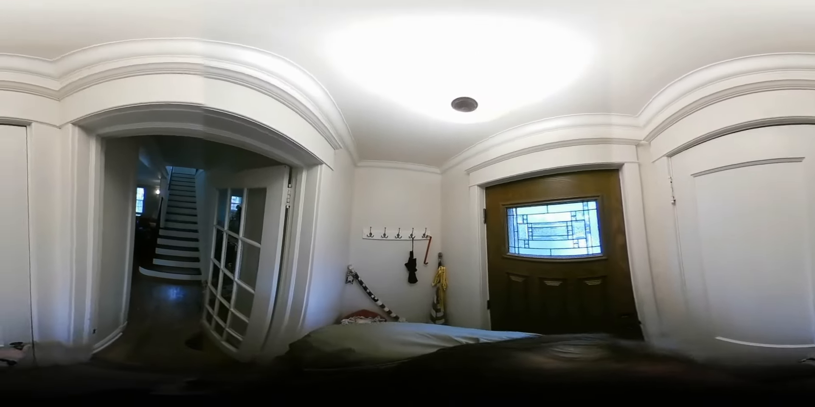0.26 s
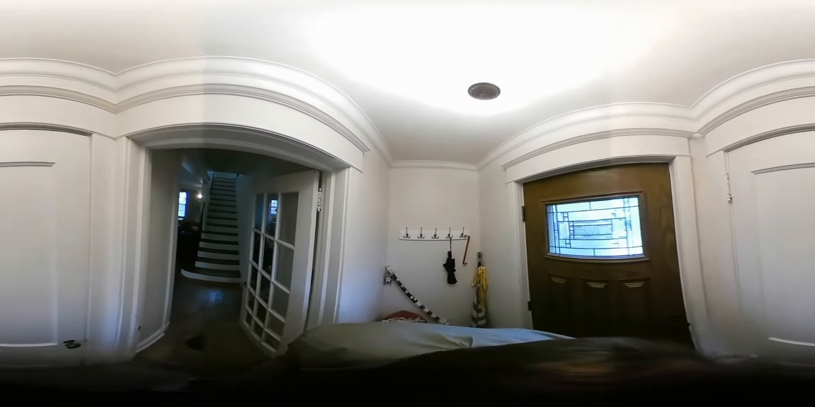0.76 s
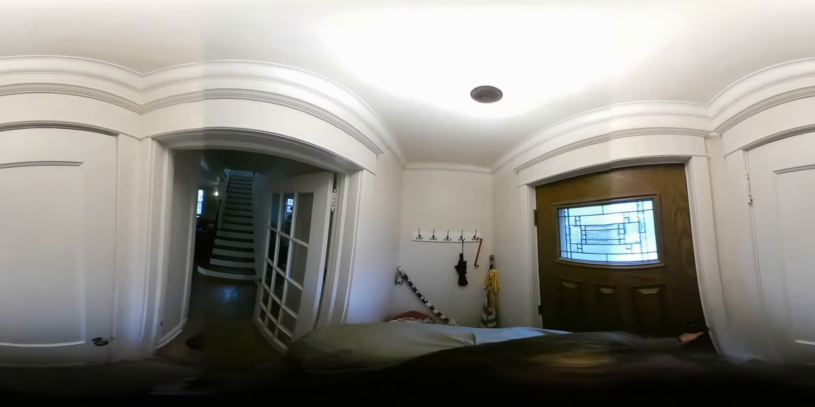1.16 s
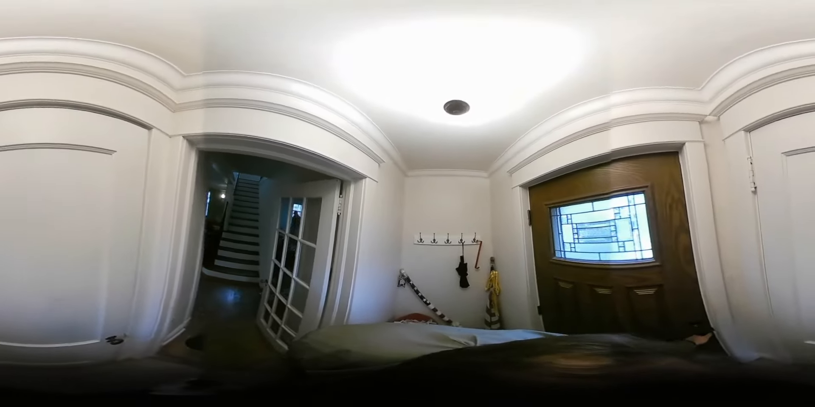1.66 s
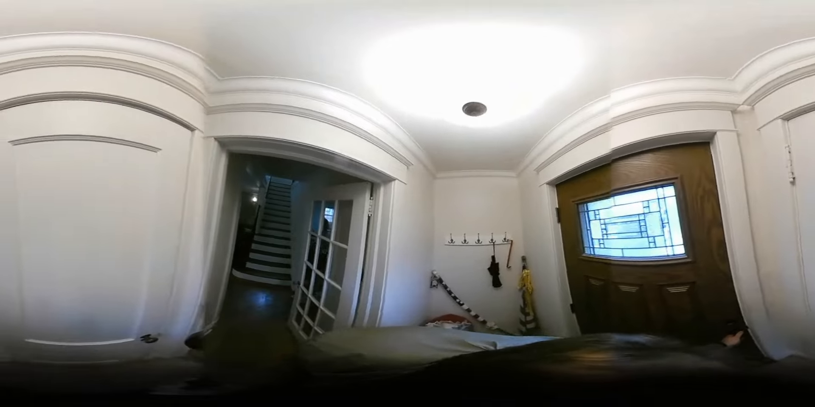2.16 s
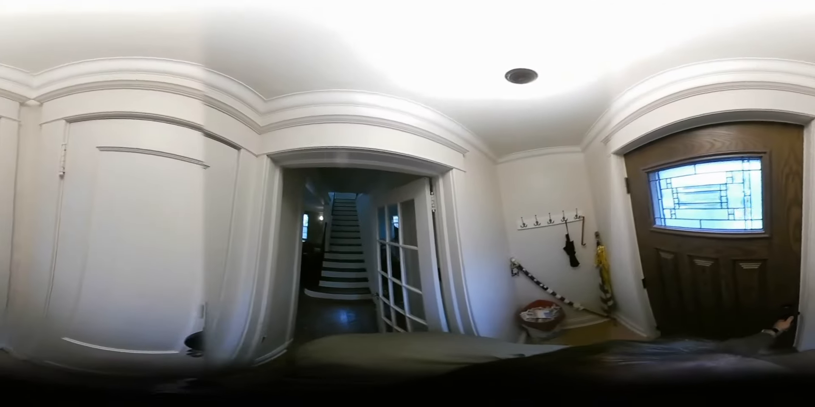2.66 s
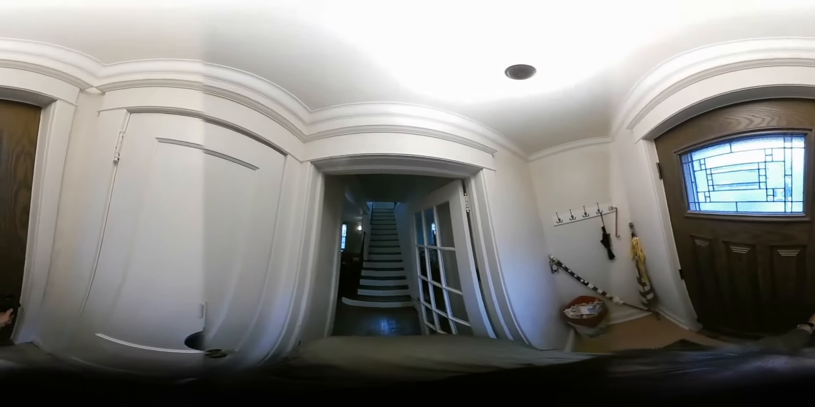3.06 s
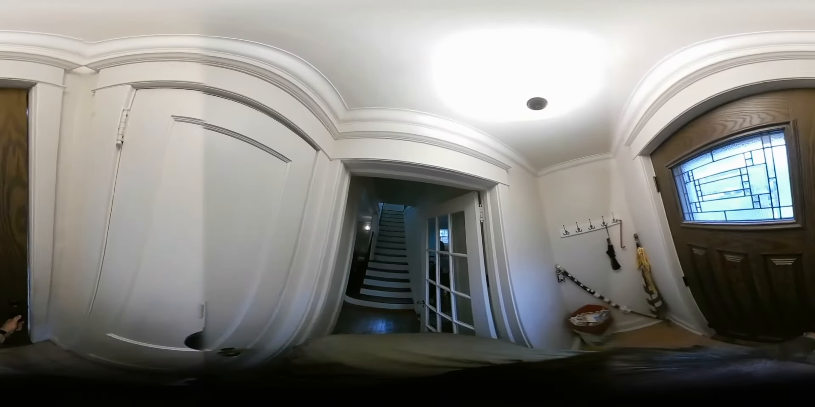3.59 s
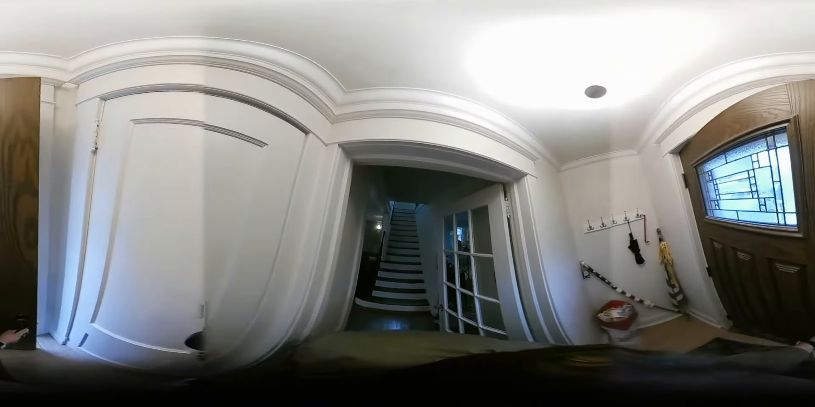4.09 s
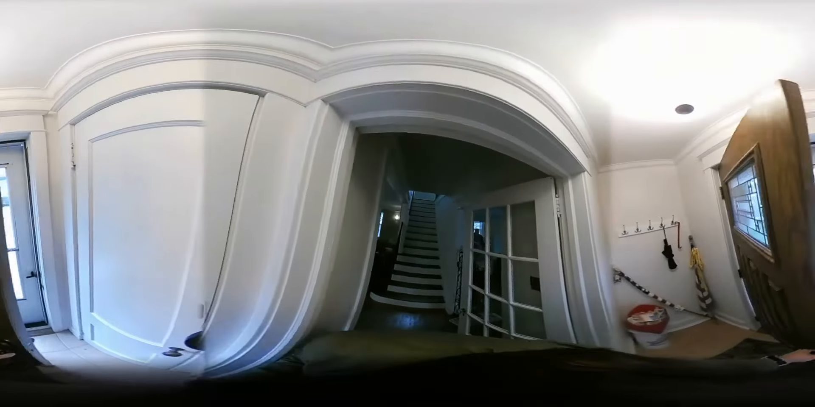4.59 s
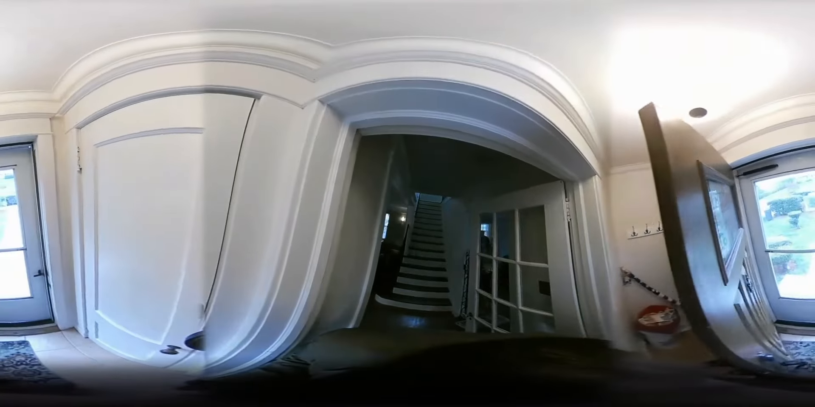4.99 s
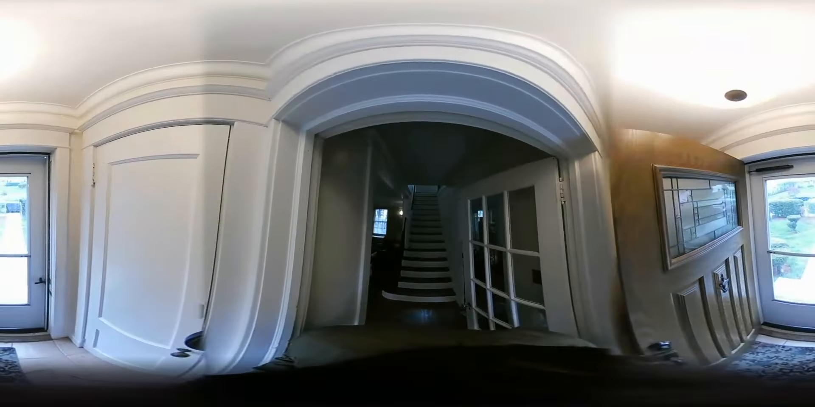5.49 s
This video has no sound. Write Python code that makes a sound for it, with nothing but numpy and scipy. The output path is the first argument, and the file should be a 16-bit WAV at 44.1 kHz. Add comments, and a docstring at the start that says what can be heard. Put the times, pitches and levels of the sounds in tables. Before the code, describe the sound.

In a small hall a door shuts loudly, a handle squeaks, then a bolt and knob click and the front door scrapes open.

```python
"""An inner door thumps shut in a small hall with hard walls; its handle squeaks back and the latch drops.
Someone steps across in a rustling jacket, turns the front door's bolt and knob, and pulls that door
off its rubber seal. It swings open on quiet outdoor air. Blows are fading tones and bursts of noise,
rubbing is noise that swells and fades, and the squeak is a tone made by steel that sticks and slips.
The right microphone faces away and hears little treble."""
import sys
import numpy as np
from scipy import signal
from scipy.fft import rfft, irfft, next_fast_len
from scipy.io import wavfile
from scipy.ndimage import map_coordinates

SR = 44100
rng = np.random.default_rng(int(sys.argv[2]) if len(sys.argv) > 2 else 0)


def waveform_to_disk(signal):
    """Save audio, clipped to [-1, 1], as 16-bit WAV at the path in sys.argv[1]."""
    frames = np.transpose(np.atleast_2d(signal))
    scaled = np.clip(frames, -1, 1) * 32767
    samples = np.round(scaled).astype(np.int16)
    wavfile.write(sys.argv[1], SR, samples)


N = 253134
TIME = np.arange(N) / SR
AFTER = TIME[:SR]  # the second that follows a blow

# Levels are relative. A "colour" says how strong each frequency is; t60 is the time to fade by 60 dB.
# the inner door hits its frame and bounces: t/s, level/dB
DOOR_HITS = [(0.0, -7), (0.025, -21), (0.091, -25)]
# notes of the door and hall ringing together: f/Hz, level/dB, t60/s
DOOR_NOTES = [(75.85, -3.5, 0.71), (89.8, -3.5, 0.76), (109, -10.5, 0.33), (128, -5, 0.7), (138, 0, 0.34),
              (251.2, -6.5, 0.23), (310.4, -6, 0.41), (375, -5.5, 0.36), (440, -22.5, 0.11),
              (507, -7.5, 0.21), (581, -20, 0.38), (628, -18, 0.27), (704, -15, 0.061), (790, -17, 0.34),
              (890, -22.5, 0.28), (920, -23.5, 0.43)]
# colour of the slam's crash: f/Hz, level/dB
CRASH_COLOUR = [(60, -4), (130, 4), (190, -8), (320, 0.5), (410, -8.5), (530, -5.5), (800, -11),
                (1400, -21.5), (4000, -33), (8000, -47), (13000, -53.5)]
# latch, bolt and knob clicks:
# t/s, level/dB, bass weight, treble weight, fade time as a share of the hall's, ring f/Hz, ring boost/dB
LOCK_CLICKS = [(0.091, -32.5, 4.5, -25, 1, 4070, -4.5), (0.238, -41.5, 6, -21.5, 0.71, 2120, 2),
               (0.256, -42, 14.5, -24, 0.62, 2500, 8), (0.4335, -42.5, -1.5, -19.5, 0.71, 4600, 2.5),
               (0.7128, -38.5, -2, -20.5, 0.75, 1876, 3.5), (1.295, -46, 5.5, -21, 0.61, 3530, -3.5),
               (1.305, -43, 1.5, -26, 0.66, 5400, -0.5), (1.808, -43.5, 7, -17, 0.65, 3030, 7.5),
               (1.815, -35.5, 5, -15.5, 0.8, 3520, 6), (1.828, -44.5, -11, -34, 0.98, 1016, 24),
               (1.92, -40, 9, -21, 0.85, 1610, 0), (1.9431, -36, -4.5, -18, 0.61, 5360, 4.5),
               (1.9489, -36, -25, -19.5, 0.51, 3255, 9.5), (2.234, -61, -7.5, -16, 0.64, 2660, 8),
               (3.1221, -38.5, -8, -21, 0.544, 1350, 2.5), (3.1886, -43.5, -8, -11.5, 0.56, 4830, 13),
               (3.503, -50, -15.5, -5, 0.76, 5770, 15.5), (3.552, -47.5, -24, -6.5, 0.7, 2480, 10.5),
               (4.010, -42, -3, -33, 0.46, 2365, 14), (4.033, -33, 14, -33.5, 1, 1210, 0),
               (4.068, -39.5, -8, -16.5, 0.74, 5950, 4)]
# colour of a steel click: f/Hz, level/dB
CLICK_COLOUR = [(100, -23.5), (220, -13), (400, -9), (650, -2), (1100, 1.5), (2000, -4.5), (2600, -4.5),
                (3300, -6.5), (4500, -10), (6500, -8.5), (10000, -12), (13000, -18)]
# resonances (favourite pitches) of the steel lock: f/Hz, width/Hz, boost/dB
STEEL_RESONANCES = [(880, 53, 1.5), (1337, 90, 5.5), (1987, 86, 6.5), (2132, 52, 7), (3160, 50, 0),
                    (3420, 97, 1.5), (4740, 200, 2.5), (5450, 210, 2), (7400, 130, 3), (8350, 500, 1.5),
                    (10400, 640, 5)]
# resonances of the door's wood: f/Hz, width/Hz, boost/dB
WOOD_RESONANCES = [(138.6, 11, 13.5), (185, 17, -7.5), (223, 43, 11), (305, 33, 14), (384, 48, -0.5),
                   (508.4, 5, 12), (634, 32, 4.5), (800, 100, 2)]
# arm movements in the jacket: t/s, hold/s, level/dB
ARM_MOVES = [(0.43, 0.06, -53), (0.76, 0.04, -61.5), (2.02, 0.02, -61.5), (2.43, 0.033, -59.5),
             (2.76, 0.023, -46.5), (3.0, 0.33, -61), (4.92, 0.031, -61), (5.22, 0.033, -73),
             (5.71, 0.037, -65)]
# colour of sliding cloth: f/Hz, level/dB
CLOTH_COLOUR = [(150, -7), (450, 1), (1300, 0), (2800, -3.5), (6000, -10.5), (9000, -16), (13000, -19)]
# how often the handle's shaft slips, from start to stop: t/s, f/Hz
SLIP_RATE = [(0.437, 533.4), (0.478, 530.1), (0.512, 553.3), (0.542, 546.2), (0.564, 534), (0.581, 485),
             (0.6, 480)]
# moments when the shaft whistles: t/s, hold/s, level/dB
SHAFT_WHISTLES = [(0.472, 0.015, -14.5), (0.522, 0.01, -28.5), (0.56, 0.004, -30.5)]
# tones in the shaft's buzz: multiple of the slip rate, level/dB
BUZZ_HARMONICS = [(1, -11.5), (3, -2), (4, -3), (5, -6.5), (6, -1.5), (7, -15), (8, -9), (9, -19),
                  (10, -16), (11, -13.5), (12, -18.5), (13, -33.5), (14, -37), (15, -47)]
# door and body shove the air: t/s, level/dB
AIR_SHOVES = [(0.45, -46.5), (0.809, -49), (1.33, -56.5), (1.93, -46.5), (2.5, -54), (3.0, -49),
              (3.22, -51.5), (3.7, -37.5), (3.98, -42), (4.14, -38), (4.43, -41.5), (4.98, -50),
              (5.31, -51), (5.599, -56)]
# colour of shoved air: f/Hz, level/dB
RUMBLE_COLOUR = [(12, -31.5), (20, 6), (33, 3.5), (64, -2), (134, 0.5), (172, -20), (218, -6), (265, -11.5),
                 (300, -11), (390, -39.5), (660, -120)]
# brief rubs of shaft, lock and seal: t/s, f/Hz, width/Hz, level/dB, half length/s
BRIEF_RUBS = [(0.595, 1357, 50, -44, 0.03), (0.642, 1102, 50, -52, 0.06), (3.715, 8240, 1593, -40.5, 0.017),
              (3.716, 2330, 600, -44.5, 0.017), (4.043, 526, 51, -28, 0.012),
              (4.045, 660, 126, -34.5, 0.014)]
# steps and knocks on the wooden door: t/s, level/dB, bass weight, treble weight, ring f/Hz
WOOD_KNOCKS = [(0.768, -42, 9.5, -17.5, 152), (0.803, -52.5, -7, -17.5, 203),
               (0.964, -55.5, 0.5, -23.5, 157.3), (1.302, -40.5, -14, -14.5, 300),
               (1.462, -52.5, -15.5, -26, 310), (1.623, -47, -33, -19.5, 553), (1.785, -50, -16, -18, 720),
               (1.829, -39.5, -22, -13, 300), (1.853, -38, 0.5, -16, 300), (2.4, -51, 5.5, -21, 150),
               (2.537, -49, -22, -18, 420), (2.97, -46, 5, -15, 262), (3.059, -49.5, 6, -34, 291),
               (3.123, -31.5, 0.5, -23.5, 186), (3.4, -53, -6, -30, 264), (3.934, -33, 8, -15, 215),
               (3.96, -32.5, 10.5, -43, 220), (3.997, -30, 10, -17, 228), (4.089, -45.5, -16, -7, 223),
               (4.134, -39.5, 13, -16, 333), (4.354, -44.5, 10, -34, 156), (4.409, -46.5, 5, -12.5, 159),
               (4.493, -42.5, -8, -16.5, 640), (4.832, -49, -42, -17.5, 800)]
# colour of a step or knock: f/Hz, level/dB
KNOCK_COLOUR = [(40, -5), (90, -6.5), (140, -4), (190, -6), (300, -7.5), (400, 0.5), (540, 0.5), (800, -3),
                (1400, -0.5), (3000, -13), (7000, -31.5), (13000, -43)]
# the door's edge slides on its seal, then pulls free: t/s, hold/s, level/dB
SEAL_SLIDES = [(3.515, 0.14, -47.5), (3.69, 0.028, -44.5), (4.01, 0.023, -47.5)]
# colour of the scraping seal: f/Hz, level/dB
SEAL_COLOUR = [(150, -1), (500, 3), (1400, -1), (2500, 2.5), (4300, -4.5), (6000, -2.5), (7500, -11.5),
               (10000, -15), (13000, -23.5)]
# soft shuffles while the door swings wide: t/s, hold/s, level/dB
FOOT_SHUFFLES = [(4.14, 0.027, -49.5), (4.42, 0.13, -52), (4.9, 0.083, -53.5), (5.18, 0.12, -60),
                 (5.71, 0.03, -59)]
# colour of outdoor air and shuffles: f/Hz, level/dB
DOORWAY_COLOUR = [(100, -24), (160, -6), (280, -7), (420, -15), (600, -8.5), (850, -12), (1300, -14.5),
                  (2500, -21), (4500, -30), (7000, -32), (13000, -36.5)]
# colour of the steady room tone and hiss: f/Hz, level/dB
ROOM_COLOUR = [(25, -6), (130, -0.5), (250, -9), (700, -10.5), (1500, -15.5), (4000, -23.5), (8000, -31.5),
               (11000, -22), (13000, -32.5)]
# how long the hall echoes: f/Hz, t60/s
HALL_FADE = [(80, 0.55), (300, 0.47), (1000, 0.35), (3500, 0.33), (7000, 0.3), (13000, 0.094)]
# how alike left and right are: f/Hz, likeness (1 = the same)
STEREO_LIKENESS = [(100, 0.99), (250, 0.68), (500, 0.81), (1000, 0.064), (2500, 0.02)]
# what the right microphone loses by facing away: f/Hz, level/dB
RIGHT_SHADE = [(300, -0.5), (700, -1), (1500, -5), (3500, -7.5), (5000, -11), (7500, -25), (10000, -23.5),
               (13000, -10)]


def amp(db):
    """Turn decibels into a number to multiply by."""
    return 10 ** (np.asarray(db) / 20)


def unit(x):
    """Scale a signal so its average strength (rms) is 1."""
    return x / np.sqrt(np.mean(x ** 2) + 1e-20)


def along(points, hz):
    """Read between (f/Hz, value) points on a logarithmic frequency scale."""
    freqs, values = np.transpose(points)
    return np.interp(np.log(hz + 1), np.log(freqs + 1), values)


def boosts(resonances, hz):
    """Decibels added by resonances given as (f/Hz, width/Hz, boost/dB)."""
    return sum(db / (1 + (2 * (hz - centre) / width) ** 2) for centre, width, db in resonances)


def ripple(hz, spacing_hz=85):
    """Random peaks and dips in a colour, left by close walls and a struck thing's many small resonances."""
    return map_coordinates(rng.standard_normal(1024), [hz / spacing_hz], order=1, mode="wrap")


def wobble(rate):
    """A smooth curve through `rate` random values a second."""
    return map_coordinates(rng.standard_normal(int(N * rate / SR) + 4), [TIME * rate])


def strokes(moves, rise, fall):
    """Loudness of (t/s, hold/s, level/dB) moves that swell, hold and fade; rise and fall are in dB/s."""
    levels = [db - rise * np.maximum(s - TIME, 0) - fall * np.maximum(TIME - s - hold, 0)
              for s, hold, db in moves]
    return np.sqrt(sum(amp(np.maximum(level, -160)) ** 2 for level in levels))


def filtered(x, response):
    """Multiply each frequency in x by response(hz)."""
    size = x.shape[-1]
    padded = next_fast_len(size + 8192)
    hz = np.fft.rfftfreq(padded, 1 / SR)
    return irfft(rfft(x, padded) * response(hz), padded)[..., :size]


def noise(colour_db, size=N):
    """Coloured stereo noise of strength 1, alike on both sides only in the bass."""
    def response(hz):
        spread = np.arccos(np.clip(along(STEREO_LIKENESS, hz), -1, 1)) / 2
        return amp(colour_db(hz)) * [np.cos(spread), np.sin(spread)]
    mid, side = filtered(rng.standard_normal((2, size)), response)
    return unit(np.array([mid + side, mid - side]))


def burst(colour_db, decay, rise_s, ripple_db=4.0):
    """A blow scattered by the walls: each frequency fades in `decay` times the hall's own fade time."""
    uneven = lambda hz: colour_db(hz) + ripple_db * ripple(hz) * hz / (hz + 500)
    hz, t, spectrum = signal.stft(noise(uneven, size=SR), SR, nperseg=256)
    fade = amp(-60 * t / (decay * along(HALL_FADE, hz)[:, None]))
    tail = signal.istft(spectrum * fade, SR, nperseg=256)[1][:, :SR]
    tail = tail / tail[:, :SR // 40].std()  # strength 1 over the first 25 ms
    return tail * (1 - np.exp(-AFTER / max(rise_s, 1e-4)))


def add(track, s, sound):
    """Mix a sound into the track, starting at s seconds."""
    part = track[:, max(round(s * SR), 0):][:, :sound.shape[-1]]
    part += sound[..., :part.shape[-1]]


def door_slam(push_hz=117, push_s=0.025, ring_db=-2, crash_db=-7):
    """The door pushes one deep pulse of air into the hall, rings and bounces in its frame."""
    out = np.zeros((2, N))
    push_shape = np.exp(-(AFTER / push_s) ** 2) * (1 - np.exp(-AFTER / 0.002))
    add(out, DOOR_HITS[0][0], -np.sin(2 * np.pi * push_hz * AFTER) * push_shape)
    for s, db in DOOR_HITS:
        ring = sum(amp(level - 60 * AFTER / t60) * np.sin(2 * np.pi * (hz * AFTER + rng.random()))
                   for hz, level, t60 in DOOR_NOTES)
        ring *= 1 - np.exp(-AFTER / 0.0042)  # soft start
        crash = burst(lambda hz: along(CRASH_COLOUR, hz), decay=1.0, rise_s=0.002)
        add(out, s, amp(db) * (amp(ring_db) * ring + amp(crash_db) * crash))
    return out


def lock_clicks(level_db=-1, snap_db=3, snap_s=0.00067, ping_db=-14, ping_t60=0.097):
    """Steel parts click, ping and knock the wood; the first snap comes straight, the rest off the walls."""
    out = np.zeros((2, N))
    snap = 1 + amp(snap_db) * np.exp(-AFTER / snap_s)
    for s, db, bass, treble, decay, ring_hz, ring_db in LOCK_CLICKS:
        rise_s = 0.00014 * amp(-0.9 * treble)  # duller clicks start more slowly
        tilt = [(500, 1.3 * bass), (1200, 0.083), (4000, 0.0027), (8000, 1.4 * (treble + 12))]
        resonances = [*WOOD_RESONANCES, *STEEL_RESONANCES, (ring_hz, 0.62 * ring_hz, ring_db)]
        # each spot that is hit stirs the high resonances differently
        uneven = lambda hz: 3 * ripple(hz, spacing_hz=410) * hz / (hz + 2500)
        colour = lambda hz: along(CLICK_COLOUR, hz) + along(tilt, hz) + boosts(resonances, hz)
        click = burst(lambda hz: colour(hz) + uneven(hz), decay, rise_s)
        close_hz = ring_hz * np.array([[0.95], [1], [1.06]])  # the struck part rings at three pitches
        tones = np.sin(2 * np.pi * (close_hz * AFTER + rng.random((2, 3, 1)))).sum(axis=1)
        ping = tones * amp(ping_db + ring_db - 60 * AFTER / ping_t60)
        add(out, s, amp(db + level_db) * (click * snap + ping))
    return out


def jacket_rustle(level_db=2):
    """Jacket cloth slides with a fine, uneven grain as the arms move."""
    cloth = noise(lambda hz: along(CLOTH_COLOUR, hz) + 2 * ripple(hz))
    grain = unit(amp(wobble(200)))
    return amp(level_db) * strokes(ARM_MOVES, rise=110, fall=62.4) * cloth * grain


def handle_squeak(jitter=0.0066, grip_s=0.0034, right_db=-7, right_lag_s=0.00027):
    """The handle's dry shaft sticks and slips; a resonance at twice the slip rate makes it whistle."""
    s, hz = np.transpose(SLIP_RATE)
    turning = np.clip(np.minimum(TIME - s[0], s[-1] - TIME) / grip_s, 0, 1)
    slip_hz = np.interp(TIME, s, hz) * (1 + jitter * wobble(400))
    phase = 2 * np.pi * np.cumsum(slip_hz) / SR
    whistle_gain = turning * strokes(SHAFT_WHISTLES, rise=480, fall=406) * amp(1.5 * wobble(120))
    whistle = whistle_gain * (np.sin(2 * phase) + amp(-20) * np.sin(4 * phase))
    buzz_gain = turning * strokes([(0.488, 0.025, -41)], rise=290, fall=490)  # it rasps at full speed
    buzz = buzz_gain * sum(amp(db) * unit(amp(4 * wobble(260))) * np.sin(k * phase)
                           for k, db in BUZZ_HARMONICS)
    walls = burst(lambda hz: 0 * hz, decay=0.67, rise_s=0.0053, ripple_db=1.5)
    to_walls = amp(-12) * whistle + amp(-3) * buzz
    echo = signal.fftconvolve(to_walls[None], walls / np.linalg.norm(walls[0]), axes=1)[:, :N]
    left = whistle + amp(-7) * buzz
    right = amp(right_db) * np.roll(left, round(right_lag_s * SR))
    return np.array([left, right]) + echo


def air_rumble(level_db=-1):
    """Air rumbles when a door or a body shoves it aside."""
    shoves = strokes([(s, 0, db) for s, db in AIR_SHOVES], rise=94, fall=65.5)
    return amp(level_db) * shoves * noise(lambda hz: along(RUMBLE_COLOUR, hz))


def rubs():
    """Each brief rub sings in one resonance: a chirp of steel or a groan of rubber."""
    out = np.zeros((2, N))
    for s, centre, width, db, half_s in BRIEF_RUBS:
        tone = noise(lambda hz: -20 * np.log10(1 + (2 * (hz - centre) / width) ** 2), size=SR)
        swell = np.exp(-np.abs((AFTER - 0.5) / half_s) ** 1.6 / 2)  # loudest half a second in
        rub = unit(tone * swell) * np.sqrt(np.mean(swell ** 2))
        add(out, s - 0.5, amp(db) * rub)
    return out


def steps_and_knocks(level_db=-3, hollow_db=7):
    """Shoes hit the floor and the heavy door shifts in its frame; each spot has its own hollow note."""
    out = np.zeros((2, N))
    for s, db, bass, treble, ring_hz in WOOD_KNOCKS:
        tilt = [(130, 1.4 * (bass - 0.5)), (280, 0), (900, 0.039), (2200, 2.4 * (treble + 15.5))]
        resonances = [*WOOD_RESONANCES, (ring_hz, 0.47 * ring_hz, hollow_db)]
        colour = lambda hz: along(KNOCK_COLOUR, hz) + along(tilt, hz) + boosts(resonances, hz)
        add(out, s, amp(db + level_db) * burst(colour, decay=0.71, rise_s=0.00053))
    return out


def seal_scrape(level_db=2.5):
    """The front door slides on its rubber seal, which catches in tiny crackles."""
    rubber = noise(lambda hz: along(SEAL_COLOUR, hz) + 2 * ripple(hz))
    crackle = unit(amp(2 * wobble(1000)))
    grain = unit(amp(wobble(200)))
    return amp(level_db) * strokes(SEAL_SLIDES, rise=276, fall=57) * rubber * crackle * grain


def open_doorway(start_s=4.1, opening_s=0.7, outdoor_db=-66.5):
    """Feet shuffle aside while the sound of outdoor air comes in through the widening gap."""
    gap = np.clip((TIME - start_s) / opening_s, 0, 1)
    shuffles = strokes(FOOT_SHUFFLES, rise=69, fall=53)
    level = np.hypot(amp(outdoor_db) * gap, shuffles)
    return level * noise(lambda hz: along(DOORWAY_COLOUR, hz)) * amp(0.74 * wobble(17))


def scene(room_db=-65):
    """Everything happens on the left, so the right is duller; an even room tone and hiss lie beneath."""
    left, right = (door_slam() + lock_clicks() + jacket_rustle() + handle_squeak() + air_rumble()
                   + rubs() + steps_and_knocks() + seal_scrape() + open_doorway())
    right = filtered(right, lambda hz: amp(along(RIGHT_SHADE, hz)))
    room_tone = amp(room_db) * noise(lambda hz: along(ROOM_COLOUR, hz))
    return np.array([left, right]) + room_tone


def record(dry, top_hz=13100):
    """Round off peaks near full scale and cut everything above top_hz."""
    rounded = dry / (1 + dry ** 8) ** (1 / 8)
    return filtered(rounded, lambda hz: hz < top_hz)


dry = scene()
out = record(dry)
waveform_to_disk(out)
```